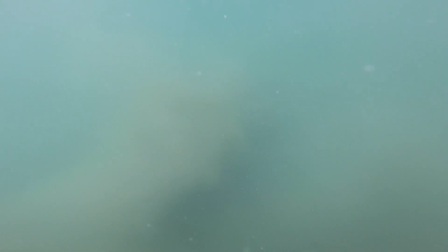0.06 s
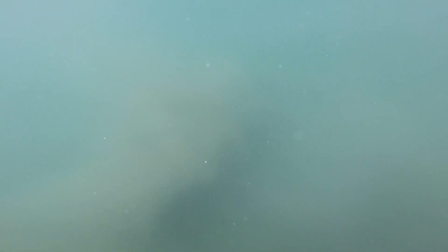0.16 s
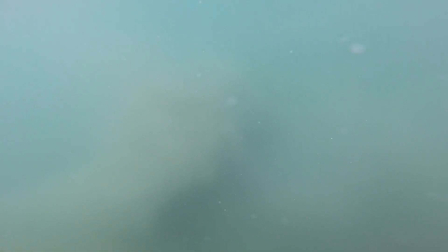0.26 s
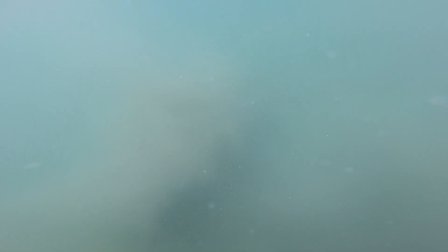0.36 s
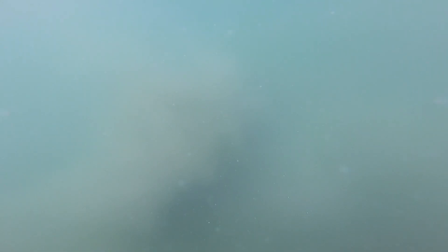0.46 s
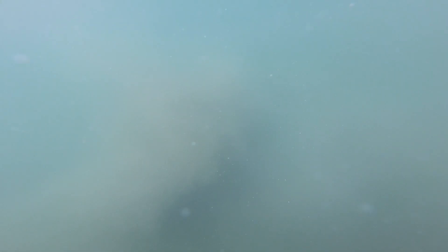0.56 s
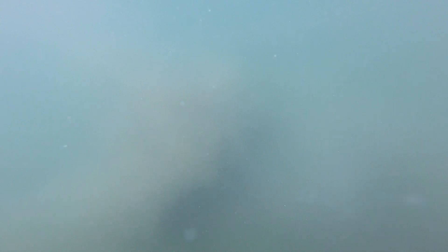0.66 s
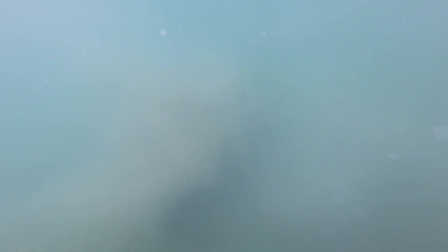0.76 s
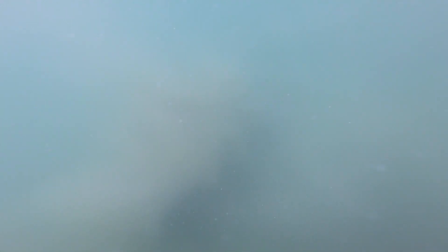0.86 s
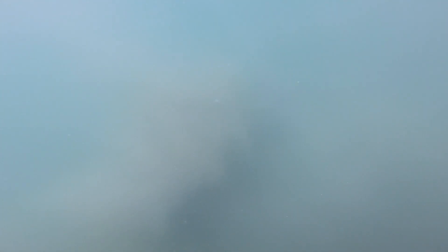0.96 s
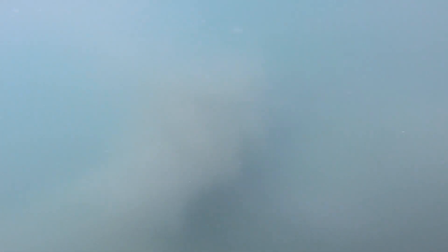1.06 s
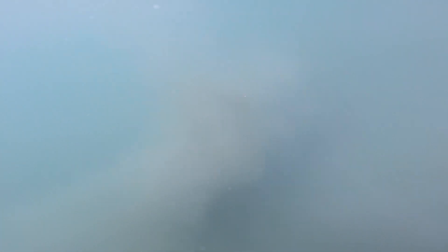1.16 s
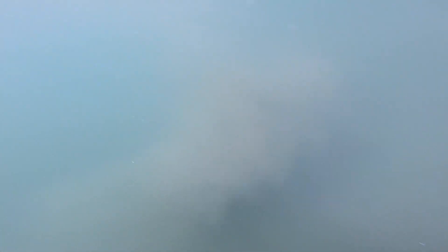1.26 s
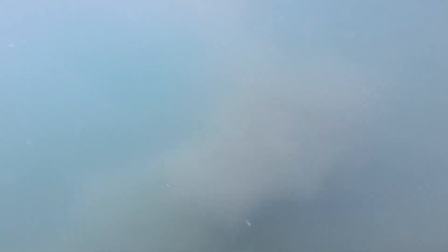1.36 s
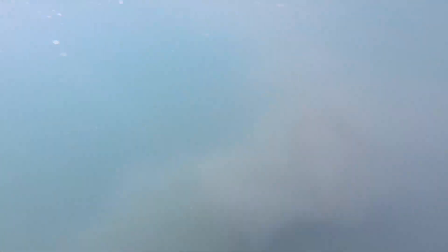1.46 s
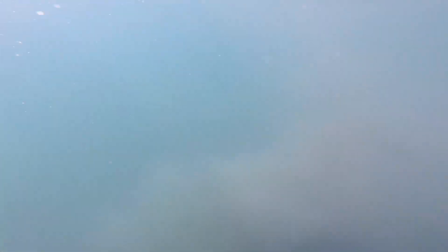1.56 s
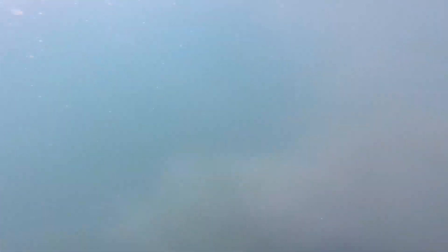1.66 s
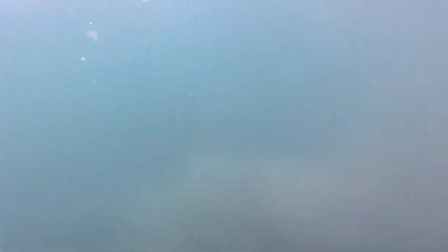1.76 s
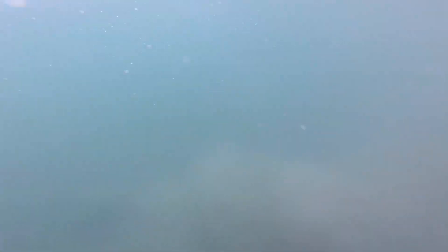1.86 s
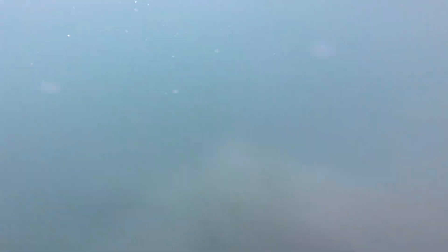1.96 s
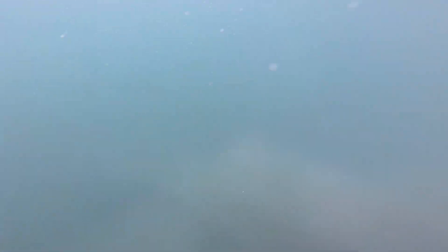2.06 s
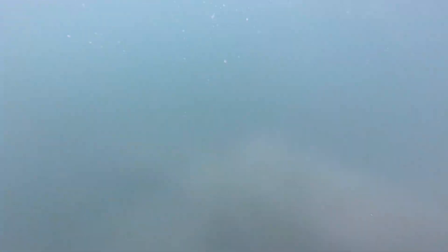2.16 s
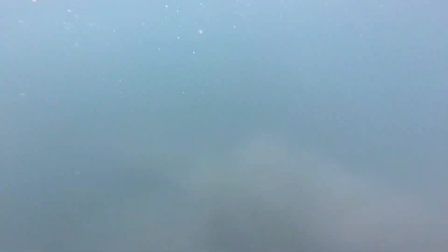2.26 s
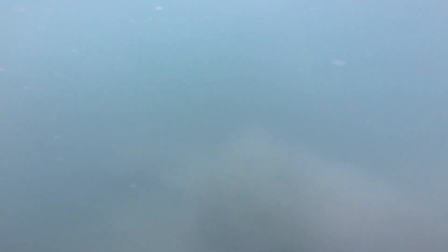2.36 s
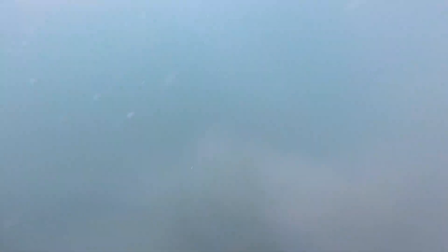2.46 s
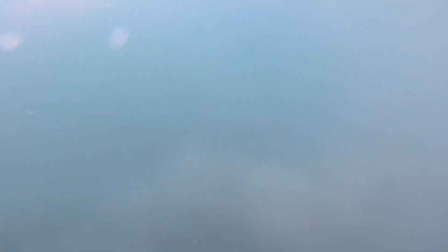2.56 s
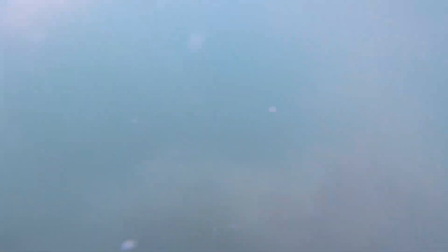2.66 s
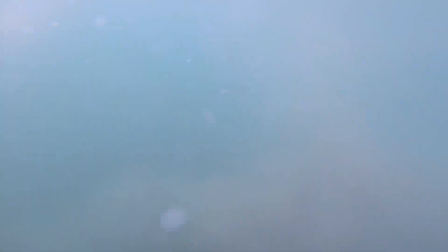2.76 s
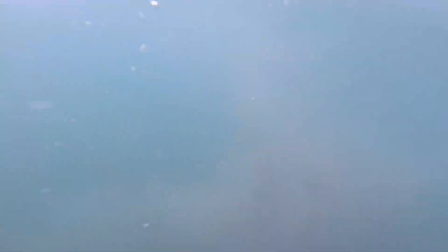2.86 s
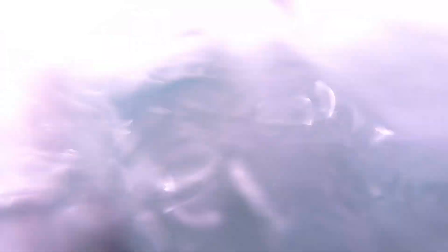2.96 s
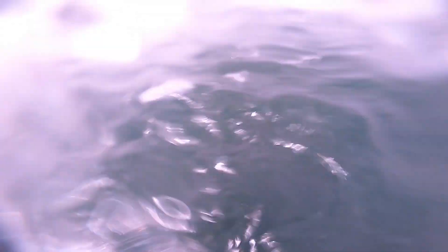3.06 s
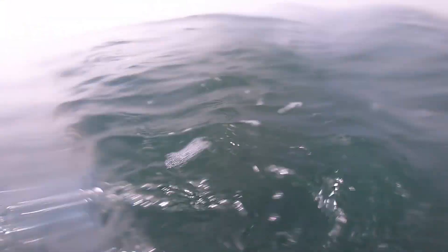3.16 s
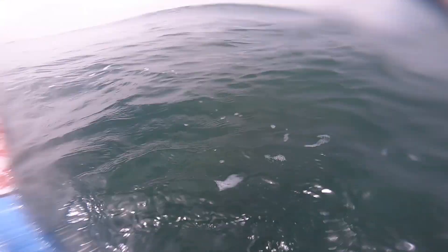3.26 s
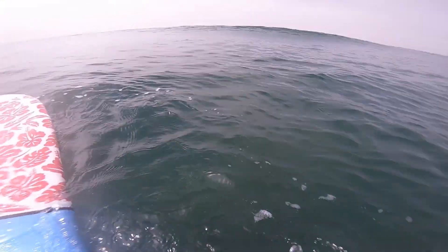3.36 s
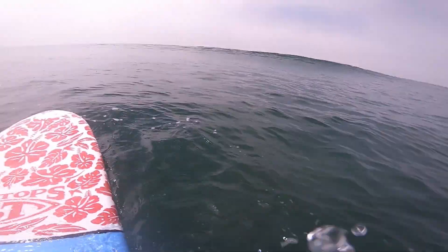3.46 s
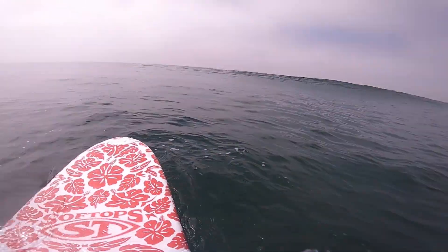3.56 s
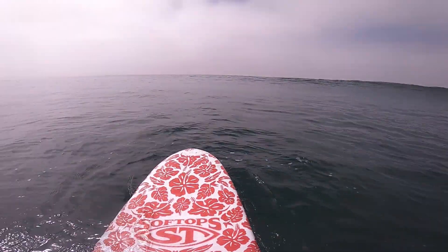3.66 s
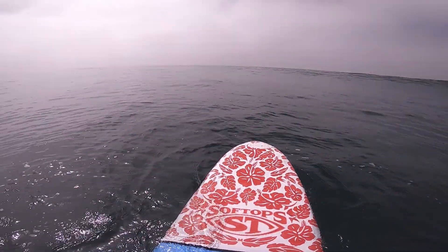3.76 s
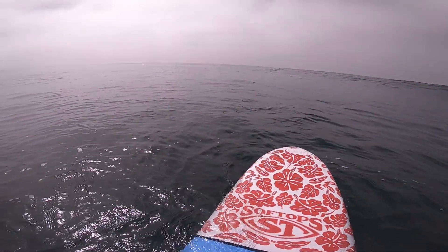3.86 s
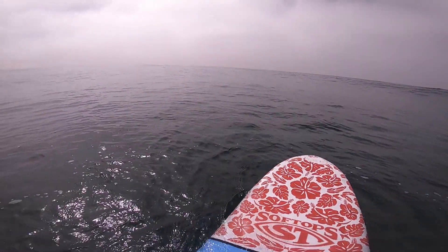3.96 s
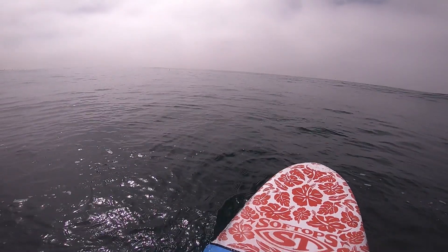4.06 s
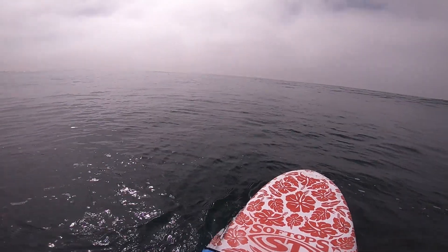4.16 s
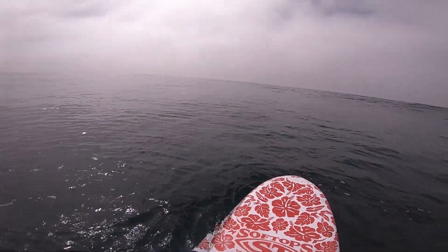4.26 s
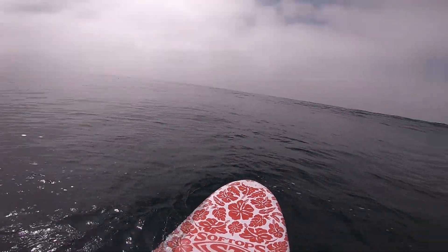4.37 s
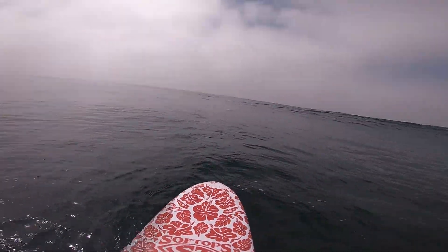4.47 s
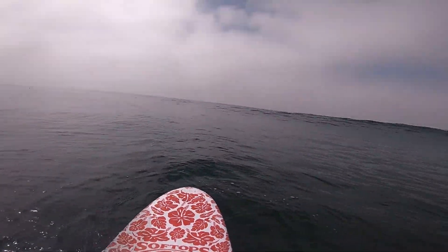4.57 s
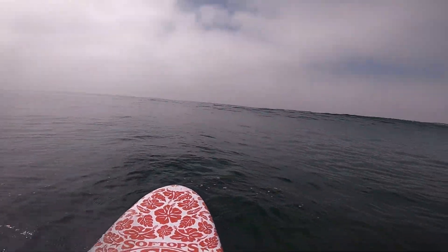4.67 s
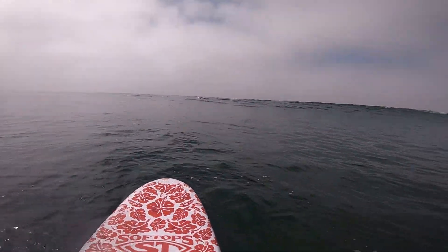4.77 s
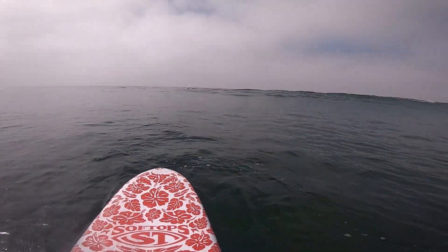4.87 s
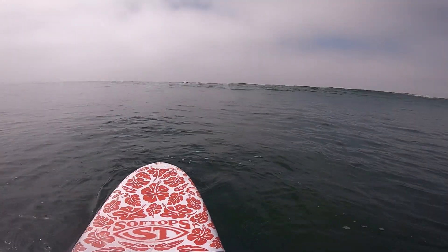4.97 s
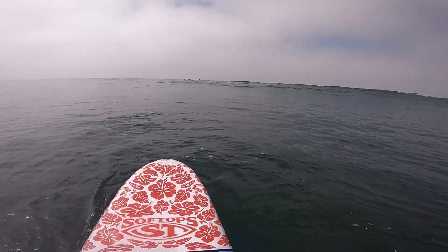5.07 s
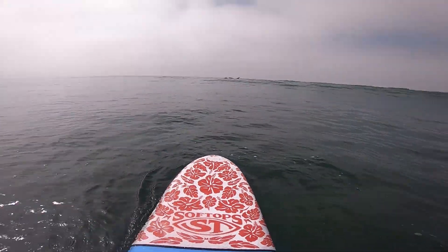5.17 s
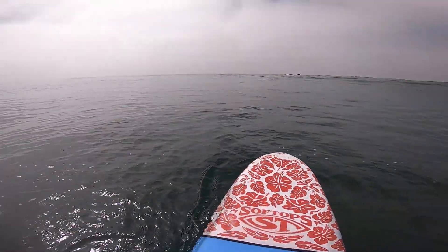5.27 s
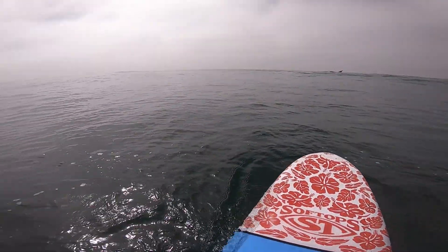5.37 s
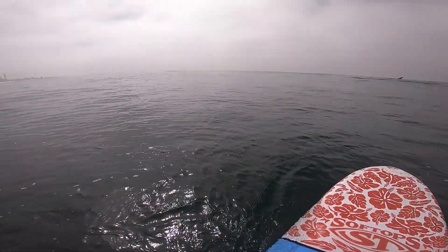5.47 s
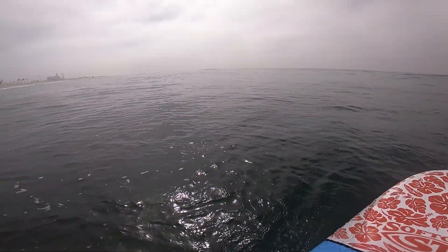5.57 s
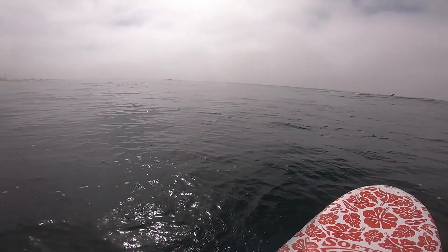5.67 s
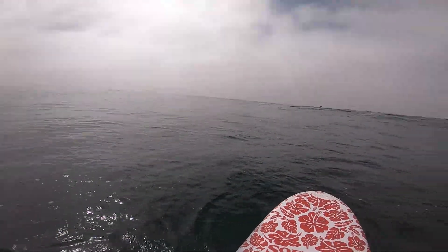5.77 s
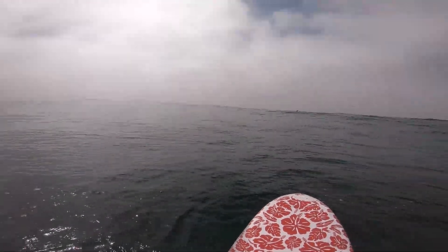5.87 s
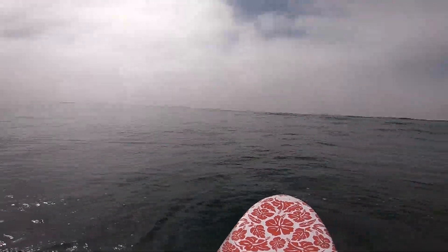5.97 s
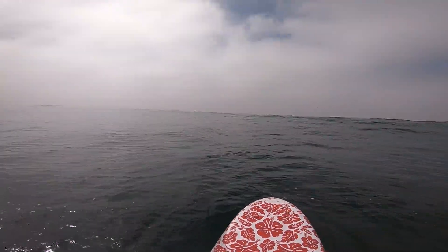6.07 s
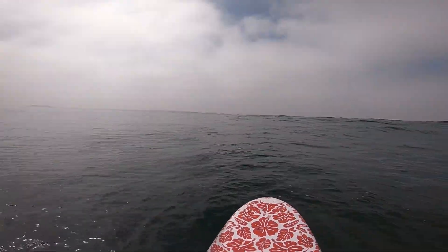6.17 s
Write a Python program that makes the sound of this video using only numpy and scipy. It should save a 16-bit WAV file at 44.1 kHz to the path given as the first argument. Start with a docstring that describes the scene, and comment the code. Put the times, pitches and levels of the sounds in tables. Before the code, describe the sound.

Heard from inside a sealed case at sea, very close and dull in the treble. First a muffled underwater rumble with isolated bubbles, a brief wet squeak and a deep bloop. Then the case surfaces in a bright spatter of drops, is slapped hard by water several times, squelches and creaks in a wet grip, and settles into soft sloshing with a few last drips.

```python
"""A camera in a waterproof case hangs under the sea beside a surfboard: dull surge, faint hiss, bubbles.
From about 1.1 s the wash is stirred; a wet squeak slides up at 1.3 s, then low slaps and bubbles follow.
At about 2.9 s it is lifted out: drops burst on the case, water slaps and drains over it in sheets, and
at 4.5-5 s the wet case creaks and judders in the grip. Wash and a few drops remain to the end.
Sources: shaped noise (water), ringing pockets (air), and impacts, slips and tones in case modes."""
import sys
import numpy as np
from scipy import signal
from scipy.fft import rfft, irfft
from scipy.io import wavfile

SR = 44100
rng = np.random.default_rng(int(sys.argv[2]) if len(sys.argv) > 2 else 0)


def wav_record(signal):
    """Record a signal, one row per channel, as 16-bit PCM in the file named by sys.argv[1]."""
    frames = np.transpose(np.atleast_2d(signal))
    bounded = np.clip(frames, -1, 1)
    # unit amplitude maps onto the largest positive 16-bit level
    quanta = np.round(bounded * 32767).astype(np.int16)
    wavfile.write(sys.argv[1], SR, quanta)


N = 274284
T = np.arange(N) / SR
# Table columns: t/s = time, f/Hz = frequency; level/dB is relative, before each function's trims.


def amp(db):
    """Decibels to gain."""
    return 10 ** (np.asarray(db) / 20)


def unit(x):
    """Scales to rms 1."""
    return x / np.sqrt(np.mean(x ** 2) + 1e-20)


def add(mix, start_s, sound):
    """Lays a sound into the mix at start_s."""
    part = mix[max(round(start_s * SR), 0):][:len(sound)]
    part += sound[:len(part)]


def wander(length, rate):
    """Random curve of rms 1: straight lines between `rate` knots per second."""
    knots = np.arange(length) * rate / SR
    return unit(np.interp(knots, np.arange(length), rng.standard_normal(length)))


def response(spectrum, modes=(), size=4096):
    """Minimum-phase impulse response of energy 1: broad spectrum plus resonant peaks."""
    hz = np.fft.rfftfreq(size, 1 / SR)
    f, db = np.transpose(spectrum)
    gain = amp(np.interp(np.log(hz + 1), np.log(f), db))
    peaks = sum(amp(d) / (1 + (2 * (hz - centre) / width) ** 2) for centre, width, d in modes)
    gain = gain * (1 + peaks)
    # folding the cepstrum makes the response causal
    cepstrum = irfft(np.log(gain))
    cepstrum[1:size // 2] *= 2
    cepstrum[size // 2 + 1:] = 0
    taps = irfft(np.exp(rfft(cepstrum)))
    return taps / np.linalg.norm(taps)


def through(x, taps):
    """Passes a sound through an impulse response."""
    return signal.oaconvolve(x, taps)[:len(x)]


def grains(length, per_s, spread_db, share):
    """Hiss mixed with tiny impacts of unequal size; share = power share of the impacts."""
    clicks = (rng.random(length) < per_s / SR) * rng.choice([-1, 1], length)
    clicks = clicks * amp(spread_db * np.minimum(rng.exponential(1, length), 4))
    return np.sqrt(share) * unit(clicks) + np.sqrt(1 - share) * rng.standard_normal(length)


# low swell spectrum: f/Hz, level/dB
SURGE_SPECTRUM = [(8, -5.5), (22, 3.5), (46, -2), (64, -10), (100, -34), (300, -62.5), (800, -86.5)]


def surge(heave_db, churn_db):
    """Slow pressure swings; stronger heave and churn break them into faster eddies."""
    eddy_spectrum = [(30, -19.5), (70, 1.5), (125, -4.5), (200, -26.5), (600, -63.5)]
    slow = unit(through(rng.standard_normal(N), response(SURGE_SPECTRUM)))
    eddies = unit(through(rng.standard_normal(N), response(eddy_spectrum)))
    eddy_db = 1.175 * heave_db + 0.82 * churn_db + 38.0
    return amp(heave_db + 1.15) * slow + amp(eddy_db) * eddies


# steady wash between swashes: t/s, level/dB
STEADY_WASH = [(0, -81), (.4, -73), (.8, -58), (1.4, -57.5), (1.62, -65.5), (2.8, -68.5), (3.85, -63),
               (4.72, -57), (5.2, -60.5), (6.22, -59.5)]
# swashes of water past the case: crest t/s, rise/s, fall/s, wash level/dB, churn level/dB
SWASHES = [(1.18, .03, 0.27, -52.5, -50.5), (1.48, 0.11, 0.042, -53, -53), (1.74, 0.12, 0.14, -65, -46),
           (2.05, 0.028, 0.19, -63.5, -52.5), (2.58, 0.11, 0.13, -61, -50),
           (2.91, 0.058, 0.079, -53, -38.5), (3.079, 0.06, .12, -40.5, -38.5),
           (3.41, 0.05, 0.096, -41, -40), (4.12, 0.07, 0.1, -45.5, -48), (4.48, 0.19, 0.083, -38, -45.5),
           (5.0, 0.093, 0.038, -40, -41.5), (5.12, 0.055, 0.055, -58.5, -43),
           (5.71, .02, 0.086, -52.5, -51)]
CALM_CHURN_DB = -64.5
CHURN_FOLLOWS, CALM_HEAVE_DB = 0.48, -44.5  # dB/dB: churn sinks with heave below CALM_HEAVE_DB


def swashes(heave_db):
    """Wash and churn levels in dB: each swash builds to a crest and ebbs over the steady water."""
    wash_power = amp(np.interp(T, *np.transpose(STEADY_WASH))) ** 2
    calm_db = CALM_CHURN_DB + CHURN_FOLLOWS * np.minimum(heave_db - CALM_HEAVE_DB, 0)
    churn_power = amp(calm_db) ** 2
    for crest_s, rise_s, fall_s, wash_db, churn_db in SWASHES:
        since_s = T - crest_s
        shape = np.exp(-np.where(since_s < 0, (since_s / rise_s) ** 2, abs(since_s / fall_s)))
        wash_power = wash_power + (amp(wash_db) * shape) ** 2
        churn_power = churn_power + (amp(churn_db) * shape) ** 2
    return 10 * np.log10(wash_power), 10 * np.log10(churn_power)


def wash(drops, spectrum, peaks):
    """Grainy rushing in one colour, split into its body and the fizz of the finest bubbles."""
    rush = through(drops, response(spectrum, peaks))
    body = signal.oaconvolve(rush, signal.firwin(61, 2950, fs=SR), "same")
    return np.array([unit(body), unit(rush - body)])


# slow heave of the sea against the case: t/s, level/dB
HEAVE = [(0, -60), (.5, -48.5), (1.05, -42.5), (1.35, -43), (1.7, -41), (2.3, -46), (2.55, -38.5),
         (2.75, -44.5), (3.15, -38), (3.8, -31.5), (3.95, -41.5), (4.2, -35.5), (4.6, -31), (4.85, -46),
         (5.15, -40), (5.4, -50.5), (5.85, -39), (6.22, -49.5)]
# low churning spectrum: f/Hz, level/dB
CHURN_SPECTRUM = [(50, -21.5), (95, -9.5), (150, 3.5), (260, -6), (380, -16), (600, -35), (1500, -59.5)]
# wash colour in still water, in stirred water, on the wet case, on the drained case
# spectra: f/Hz, level/dB; peaks: f/Hz, width/Hz, level/dB
STILL_SPECTRUM = [(250, -30), (500, -25), (680, -11), (1080, -19), (1500, -12.5), (1850, -2), (2300, -11),
                  (2750, -9.5), (3600, -11), (4500, -8.5), (6000, -14.5), (7000, -18.5), (14000, -49)]
STILL_PEAKS = [(1840, 110, -12), (2340, 79, 8), (3080, 200, -6)]
STIRRED_SPECTRUM = [(250, -18.5), (500, -8), (700, -0.5), (1050, -5), (1550, -5.5), (2100, -6),
                    (2700, -4.5), (3600, -5.5), (5000, -14.5), (6000, -10.5), (7000, -19), (8500, -24.5),
                    (14000, -56)]
STIRRED_PEAKS = [(2000, 46, 2), (2270, 55, 2), (3050, 260, -6), (4540, 300, 3.5)]
WET_SPECTRUM = [(250, -19), (500, 0), (900, -4), (1600, 4.5), (2300, -2.5), (3000, -10), (3900, -14),
                (5500, -14.5), (6500, -22), (8500, -44), (14000, -58)]
WET_PEAKS = [(1713, 35, 9.5), (1930, 90, -8), (4200, 230, 1.5)]
DRAINED_SPECTRUM = [(250, 2), (400, 1.5), (600, -16), (900, -10), (1400, -0.5), (2000, -7), (2400, -11),
                    (4000, -16.5), (5000, -15), (6000, -20.5), (7000, -27.5), (8500, -42.5), (14000, -55.5)]
DRAINED_PEAKS = [(1300, 320, -9), (2670, 130, -4.5), (3500, 190, 7), (4490, 190, 10.5)]
STIRRED_S, SURFACING_S = 1.137, 2.88  # water round the case starts to move; case leaves the sea
DRAINED_S = 4.6  # film of water has run off
FIZZ_DB, FIZZ_FOLLOWS, QUIET_WASH_DB = -69.5, 0.47, -64  # fizz over quiet wash; dB per dB of wash
STILL_FIZZ_DB, STIRRED_FIZZ_DB, DRAINED_FIZZ_DB = -3, 0, -3  # re wet case in air


def flow():
    """Pressure surges, low churning, and a wash recoloured as the water stirs, the case surfaces and drains."""
    heave_db = np.interp(T, *np.transpose(HEAVE))
    wash_db, churn_db = swashes(heave_db)
    # 40 ms crossfades between stages
    stirred, above, drained = (np.clip((T - moment_s) / .04 + .5, 0, 1)
                               for moment_s in (STIRRED_S, SURFACING_S, DRAINED_S))
    still, under, wet = 1 - stirred, stirred - above, above - drained

    fizz_db = FIZZ_DB + FIZZ_FOLLOWS * (wash_db - QUIET_WASH_DB)
    fizz_db = fizz_db + STILL_FIZZ_DB * still + STIRRED_FIZZ_DB * under + DRAINED_FIZZ_DB * drained

    rumble = through(rng.standard_normal(N), response(CHURN_SPECTRUM))
    churn = unit(rumble * amp(3.5 * wander(N, rate=23))) * amp(churn_db + 4.0)

    wash_db = wash_db + 1.9 * wander(N, rate=48)
    drops = grains(N, per_s=800, spread_db=4.0, share=0.4)
    stages = [(still, STILL_SPECTRUM, STILL_PEAKS), (under, STIRRED_SPECTRUM, STIRRED_PEAKS),
              (wet, WET_SPECTRUM, WET_PEAKS), (drained, DRAINED_SPECTRUM, DRAINED_PEAKS)]
    body, fizz = sum(share * wash(drops, spectrum, peaks) for share, spectrum, peaks in stages)
    return surge(heave_db, churn_db) + churn + body * amp(wash_db - 1.7) + fizz * amp(fizz_db - 1.4)


# wet squeak under water: t/s, f/Hz, level/dB
SQUEAK = [(1.30, 202.6, -42.5), (1.331, 254.6, -44.5), (1.342, 313, -35.5), (1.362, 487, -38),
          (1.385, 503, -38), (1.402, 491, -35.5), (1.412, 553, -37), (1.426, 580, -48)]
# harmonics 1, 2, 3...: level/dB
SQUEAK_PARTIALS_DB = [6, 0, -15, -37]


def squeak():
    """Wet rubbing: a rough, scraping harmonic tone that slides upwards."""
    s, hz, db = np.transpose(SQUEAK)
    t, out = np.arange(s[0], s[-1], 1 / SR), np.zeros(N)
    turns = np.cumsum(np.interp(t, s, hz) * (1 + 0.05 * wander(len(t), rate=650))) / SR
    tone = sum(amp(d) * np.sin(2 * np.pi * (k + 1) * turns) for k, d in enumerate(SQUEAK_PARTIALS_DB))
    rough_tone = unit(tone * amp(1.9 * wander(len(t), rate=830)))
    scrape_spectrum = [(100, -11), (300, -5), (1200, 4.5), (1700, -11.5), (3000, -13), (8000, -54)]
    scrape = through(rng.standard_normal(len(t)), response(scrape_spectrum))
    add(out, s[0], (0.92 * rough_tone + 0.34 * scrape) * amp(np.interp(t, s, db)))
    return out


# swarms of fainter bubbles:
# start t/s, end t/s, rate/s^-1, first level/dB, last level/dB, centre f/Hz, spread/octaves
SWARMS = [(1.204, 2.803, 7, -55, -57, 2000, 1.65), (2.901, 3.127, 240, -35.5, -35.5, 3210, 1.8),
          (3.132, 3.648, 70, -45.5, -50.5, 3415, 1.7)]
SWARM_SPREAD_DB, SWARM_SPLASH, SWARM_RING_CYCLES = 12, 0.24, 3.2


def swarms():
    """Chance bubbles, as rows like those of BUBBLES; smaller ones ring higher and shorter."""
    for start_s, end_s, per_s, first_db, last_db, centre_hz, octaves in SWARMS:
        count = max(round(per_s * (end_s - start_s)), 1)
        for k, (place, strength, size) in enumerate(rng.random((count, 3))):
            age = (k + place) / count
            db = first_db + (last_db - first_db) * age + SWARM_SPREAD_DB * (strength - .5)
            hz = centre_hz * 2 ** (octaves * (size - .5))
            yield start_s + age * (end_s - start_s), db, hz, SWARM_RING_CYCLES / hz, SWARM_SPLASH


LINGER_DB, LINGER_TIMES = -23, 4.7  # faint ring outlasting the burst; multiple of its decay
SPLASH_FROM = 0.35  # splash high-pass corner / bubble pitch, corner at most SR / 4


def pocket(db, hz, swell_s, decay_s, splash):
    """An air pocket swells into ringing, rises in pitch as it shrinks, and bursts: lead/s, ring, splash."""
    t = np.arange(-SR // 20, SR // 9) / SR
    burst, linger = (amp(db + 1.0) * np.exp(-np.logaddexp(-t / swell_s, t / fall_s))
                     for fall_s in (decay_s, LINGER_TIMES * decay_s))
    pitch_hz = hz * (1 + .06 * np.tanh(t / 0.021) + .07 * wander(len(t), rate=hz / 3))
    ring = (burst + amp(LINGER_DB) * linger) * np.sin(2 * np.pi * np.cumsum(pitch_hz) / SR)
    highpass = signal.butter(2, min(SPLASH_FROM * hz, SR / 4), "high", fs=SR, output="sos")
    spray = signal.sosfilt(highpass, rng.standard_normal(len(t)))
    return t[0], ring, burst * splash * spray


# clearest bubbles and drops: t/s, level/dB, f/Hz, decay/s, splash share
BUBBLES = [(0.118, -53, 2260, 0.0019, 0.89), (0.173, -45.5, 1591, 0.0035, 0.19),
           (.325, -50, 2300, 0.0016, 1), (0.39, -36.5, 1136, 0.002, .35), (0.42, -54, 3130, 0.0027, 1),
           (0.734, -30.5, 2256, .0016, 0.11), (.891, -50, 1850, .004, .1), (1.238, -42, 974, .003, 1),
           (1.515, -39.5, 1203, .004, 0.53), (1.566, -43, 1626, .003, 0.17),
           (1.637, -46.5, 4860, 0.0032, 1), (1.665, -30.5, 208, 0.0055, 0.14),
           (1.851, -14.5, 213, 0.0079, 0.0061), (1.885, -27.5, 249.7, 0.01, .02),
           (1.914, -28, 156.7, 0.019, 0), (1.966, -27, 147.7, 0.01, 0), (2.038, -48, 1940, 0.0098, .15),
           (2.135, -43.5, 3496, 0.0093, 1), (2.151, -48, 1600, 0.012, 0.17), (2.214, -39, 1429, 0.0086, 0),
           (2.301, -48, 1563, 0.016, 0.56), (2.42, -46, 3400, 0.0028, 0.65),
           (2.603, -49, 4620, 0.0032, 0.54), (2.795, -43, 1575, 0.0037, 1),
           (2.908, -42, 6700, 0.0014, 0.69), (2.919, -14, 2160, 0.0024, 0.0016),
           (2.926, -12, 2218, 0.0018, 0.31), (2.934, -12.5, 2152, 0.0031, .5),
           (2.935, -21.5, 1020, 0.0084, .4), (2.953, -27.5, 6400, 0.0026, 0.63),
           (2.97, -24.5, 5750, 0.0057, .1), (2.982, -22, 3801, 0.0033, 0.39),
           (3.019, -15.5, 5521, 0.0016, 0.99), (3.025, -18, 3805, 0.0027, .7),
           (3.026, -27.5, 1400, .007, .1), (3.0537, -14, 3235, 0.001, 0.97), (3.065, -17, 3227, 0.0036, .8),
           (3.07, -7.5, 3127, .0022, 0.16), (3.102, -22.5, 2190, 0.0025, 1),
           (3.104, -27.5, 5590, 0.0043, 0.48), (3.193, -38.5, 5080, 0.0072, 1),
           (3.424, -32, 1096, 0.0045, 0.45), (3.468, -24.5, 2592, 0.0019, 0.45),
           (3.571, -35, 3203, 0.0042, 1), (4.075, -45, 5190, .002, 1), (4.439, -16, 2008, 0.0025, 0),
           (4.494, -25, 4510, 0.011, 0.087), (5.667, -43, 1483, 0.0025, 0.35),
           (5.806, -35.5, 1793, 0.0029, .3), (6.117, -45, 2740, 0.0021, 1)]
# air squeezed out between water and case: t/s, level/dB, f/Hz, swell/s
SQUELCHES = [(1.162, -36.5, 1464, 0.0065), (1.461, -37, 1550, 0.016), (3.156, -13.5, 1653, 0.0041),
             (3.389, -15.5, 1443, 0.0036), (4.304, -30.5, 2170, 0.012), (4.32, -12, 1696, 0.0072),
             (4.638, -22.5, 1570, 0.011), (4.767, -14, 1590, 0.0073), (4.915, -18.5, 1600, 0.0064)]
SWELL_SHARE = 0.21  # bubble swell / decay
SQUELCH_BREAK_S, SQUELCH_SPLASH = 0.0029, 0.06


def bubbles():
    """Free bubbles start quickly and ring out; squeezed air mostly swells slower and breaks off."""
    rings, splashes = np.zeros(N), np.zeros(N)
    pockets = [(s, db, hz, swell_s, SQUELCH_BREAK_S, SQUELCH_SPLASH) for s, db, hz, swell_s in SQUELCHES]
    for s, db, hz, decay_s, splash in BUBBLES + list(swarms()):
        pockets.append((s, db, hz, SWELL_SHARE * decay_s, decay_s, splash))
    for s, *traits in pockets:
        lead_s, ring, splash = pocket(*traits)
        add(rings, s + lead_s, ring)
        add(splashes, s + lead_s, splash)
    colour = response([(200, -7.5), (900, 8.0), (1800, 7), (3300, 0.0), (4200, 0), (5800, -5),
                       (7200, -29.5), (8300, -22), (10000, -42), (14000, -52)])
    return amp(-1.0) * rings + amp(-2) * through(splashes, colour)


def gurgle(length, centre_hz, per_s, cycles):
    """A swarm of small bubbles of mixed size, each a short rising ring."""
    out, t = np.zeros(length), np.arange(SR // 40) / SR
    for place, size, strength in rng.random((1 + int(per_s * length / SR), 3)):
        hz = centre_hz * 2 ** (1.2 * (size - .5))
        shape = t * np.exp(-t * hz / cycles) * hz / cycles
        ring = np.sin(2 * np.pi * hz * t * (1 + 4 * t)) * shape
        add(out, place * length / SR - cycles / hz, amp(14 * strength) * ring)
    return unit(out)


# blow heard through the case: f/Hz, level/dB
CASE_SPECTRUM = [(40, -11), (200, 2.5), (400, -3), (560, -6), (750, -1), (1150, 1), (1500, -1.5),
                 (2000, -2), (2500, -7), (3200, -17.5), (4000, -17.5), (4800, -20.5), (6300, -30.5),
                 (9500, -61), (14000, -75.5)]
# case ringing, shared by sheets, judders and slaps: f/Hz, width/Hz, level/dB
CASE_MODES = [(367, 130, 5), (710, 80, -15), (1457, 270, -14), (1830, 80, -6), (3320, 130, -9.5),
              (4300, 200, -9.5)]
# water running over the case: start t/s, end t/s, level/dB, treble tilt/(dB/octave)
SHEETS = [(1.413, 1.51, -46, -2.5), (1.672, 1.736, -56.5, 3.5), (2.493, 2.539, -51, -3),
          (2.876, 2.989, -36, 5.5), (3.008, 3.079, -33, 3), (3.137, 3.172, -34, 6), (3.169, 3.28, -52, 8),
          (3.372, 3.423, -44.5, 4.5), (3.681, 3.754, -37.5, 3.5), (3.996, 4.039, -43.5, 0.5),
          (4.269, 4.36, -42, -4.5), (4.352, 4.474, -41, 0), (4.457, 4.521, -27, 2), (4.529, 4.583, -41, 2),
          (4.59, 4.639, -30, -1), (4.936, 5.013, -35, 2), (4.993, 5.059, -52.5, -3), (5.1, 5.199, -49.5, 3),
          (5.14, 5.17, -43.5, 9.5)]


def sheets():
    """Running water breaks into clumps of droplets that drum on the case, and traps small bubbles."""
    out = np.zeros(N)
    for start_s, end_s, db, tilt_db in SHEETS:
        length = max(round((end_s - start_s) * SR), 64)
        swell = signal.windows.tukey(length, .4)
        drops = grains(length, per_s=2000, spread_db=-0.5, share=0.7)
        clumps = drops * amp(2.1 * wander(length, rate=180))
        colour = response([(hz, d + tilt_db * np.log2(hz)) for hz, d in CASE_SPECTRUM], CASE_MODES)
        add(out, start_s, amp(db - 4.0) * signal.fftconvolve(unit(clumps * swell), colour))
        # brighter spray holds smaller bubbles
        trapped = gurgle(length, centre_hz=1700 * 2 ** (tilt_db / 7), per_s=210, cycles=4.5)
        add(out, start_s, amp(db - 6.0) * swell * trapped)
    return out


# singing of the rubbed case: t/s, level/dB, swell/s
CREAKS = [(4.64, -33.5, 0.019), (4.769, -30, 0.012), (4.915, -24, 0.0069)]
# f/Hz, level/dB
CREAK_TONES = [(400, 2), (1630, -3.5), (2500, -14), (2870, -12), (3600, -18.5), (4720, -23)]


def creaks():
    """Friction pumps the case's modes until they swell and break off."""
    out, t = np.zeros(N), np.arange(-SR // 15, SR // 25) / SR
    for s, db, swell_s in CREAKS:
        shape = amp(db) * np.exp(np.where(t < 0, t / swell_s, -t / 0.0096))
        for hz, tone_db in CREAK_TONES:
            pitch_hz = hz + 45 * wander(len(t), rate=317)
            tone = np.sin(2 * np.pi * np.cumsum(pitch_hz) / SR)
            add(out, s + t[0], amp(tone_db) * shape * tone)
    return out


# wet case sticking and slipping: start t/s, end t/s, level/dB, first slip f/Hz, last slip f/Hz
JUDDERS = [(4.477, 4.501, -13, 178, 235), (4.763, 4.776, -12.5, 252, 258), (4.915, 4.925, -11.5, 330, 310),
           (4.94, 4.955, -13.5, 347, 330), (4.959, 4.991, -16.5, 344, 604)]
# slip heard through the case: f/Hz, level/dB
JUDDER_SPECTRUM = [(60, -5.5), (230, 3), (350, -1.5), (550, -7.5), (750, -1.5), (1150, -9), (1500, -4.5),
                   (2000, -8), (2500, -29.5), (3500, -31.5), (5000, -36.5), (7000, -64), (9500, -110.5)]


def judders():
    """Short runs of uneven slips, each knocking the case into its modes; the loudest swings are softly rounded
    off."""
    out, case = np.zeros(N), response(JUDDER_SPECTRUM, CASE_MODES)
    lowpass = signal.butter(4, 4800, fs=SR, output="sos")
    for start_s, end_s, db, first_hz, last_hz in JUDDERS:
        length = max(round((end_s - start_s) * SR), 64)
        slip_hz = np.linspace(first_hz, last_hz, length) * (1 + 0.076 * wander(length, rate=300))
        turns = np.cumsum(slip_hz) / SR
        # one impulse per whole turn
        slips = np.diff(np.floor(turns), prepend=-1) * amp(1.1 * wander(length, rate=390))
        drive = unit(unit(slips) + 0.64 * rng.standard_normal(length))
        swing = signal.fftconvolve(drive, case)
        swing = signal.sosfilt(lowpass, 2.68 * np.tanh(swing / 2.59))
        add(out, start_s, -amp(db) * swing)
    return out


# water slapping the case: t/s, push level/dB, settled push f/Hz, crack level/dB
SLAPS = [(1.692, -23.5, 142, -26), (1.699, -18.5, 37.7, -53), (1.714, -28, 116, -24), (1.73, -19, 51, -36),
         (1.978, -28.5, 151, -44), (2.892, -20.5, 212, -19.5), (2.906, -20.5, 146, -19.5),
         (3.159, -13, 49, -17), (3.389, -14.5, 47.8, -16), (3.456, -27, 148, -32), (3.518, -20, 48.5, -46),
         (3.577, -21, 71, -33), (3.698, -16, 126, -55), (3.708, -12.5, 222, -5.5), (3.716, -12, 65, -38),
         (3.729, -13, 120.6, -15), (3.743, -15.5, 42, -18.5), (4.007, -25, 90.5, -29.5),
         (4.155, -46, 118, -23), (4.32, -17, 87, -13.5), (4.357, -21, 39.3, -22), (4.373, -26, 89, -21),
         (4.387, -15, 44.8, -28), (4.439, -12.5, 124, -16.5), (4.503, -9, 74, -13), (4.519, -13, 88, -9),
         (4.541, -13, 87, -9), (4.569, -12, 91, -8.5), (4.639, -6.5, 232, -7.5), (4.774, -10.5, 174, -26.5),
         (4.925, -15.5, 137, -25), (4.951, -12, 149, -22), (5.147, -28, 167, -44), (5.706, -34, 99, -44)]
PUSH_CYCLES = 0.7  # push decay constant, in cycles of the settled f
LEAD_S, LEAD_SHARE = 0.0015, 0.085  # air hisses out just before a slap lands


def slaps():
    """Each slap is a crack in the case and a pressure swing that slows as the water spreads."""
    pushes, cracks, t = np.zeros(N), np.zeros(N), np.arange(SR // 3) / SR
    for s, push_db, hz, crack_db in SLAPS:
        turns = hz * (t + 0.0046 * (1 - np.exp(-t / 0.012)))
        shape = np.exp(-t * hz / PUSH_CYCLES) * (1 - np.exp(-t / 0.00034))
        add(pushes, s, amp(push_db + 3.0) * np.sin(2 * np.pi * turns) * shape)
        spatter = 0.25 * rng.standard_normal(len(t)) * np.exp(-t / 0.0031)
        add(cracks, s, amp(crack_db - 5.5) * ((t == 0) + spatter))
        lead = LEAD_SHARE * rng.standard_normal(len(t)) * np.exp(-t[::-1] / LEAD_S)
        add(cracks, s - t[-1], amp(crack_db) * lead)
    case = response(CASE_SPECTRUM, CASE_MODES)
    return pushes - through(cracks, case / abs(case).max())


def scene():
    """All the water and handling sounds at the one microphone."""
    return (flow() + squeak() + bubbles() + sheets() + creaks() + judders() + slaps())[None]


def record(dry):
    """The hardest blows round off in the microphone, whose treble is dull; then the recorder's band limit."""
    knee, headroom, treble_hz, edge_hz = .42, .22, 8600, 14200  # knee, headroom: re full scale
    over = np.maximum(abs(dry) - knee, 0)
    rounded = dry - np.sign(dry) * (over - headroom * np.tanh(over / headroom))
    dull = signal.sosfilt(signal.butter(2, treble_hz, fs=SR, output="sos"), rounded)
    band_limit = signal.firwin(511, edge_hz, window=("kaiser", 9), fs=SR)
    return signal.oaconvolve(dull, band_limit[None], "same")


dry = scene()
out = record(dry)
wav_record(out)
```